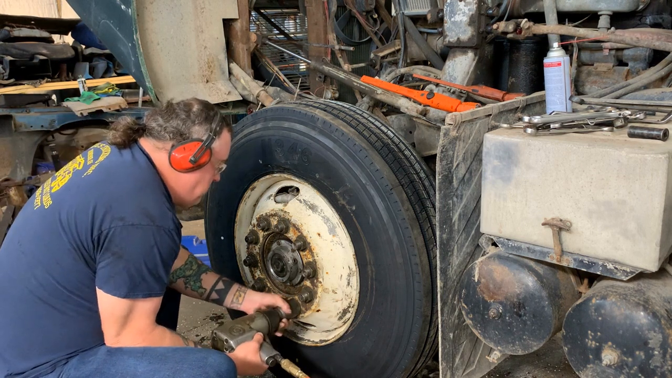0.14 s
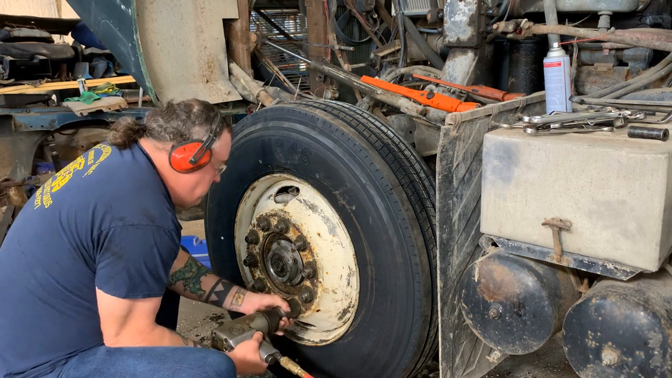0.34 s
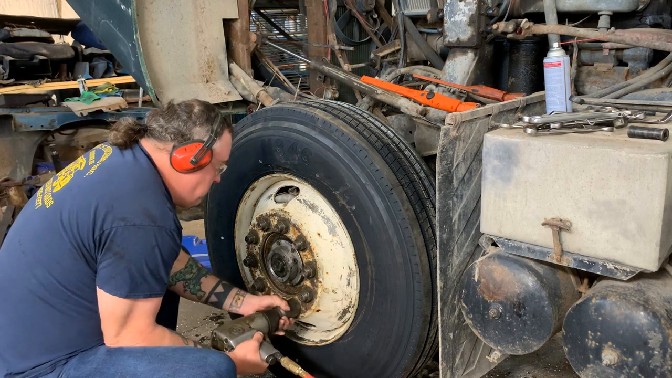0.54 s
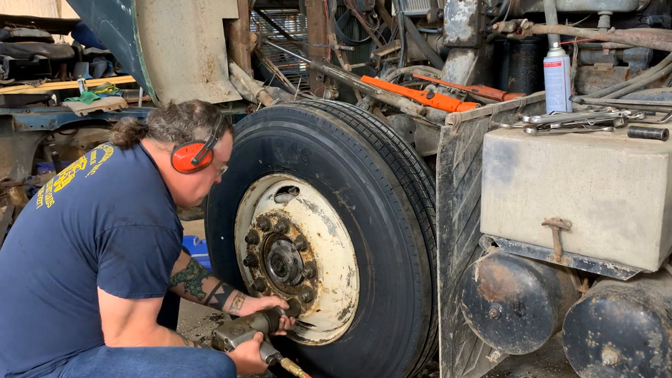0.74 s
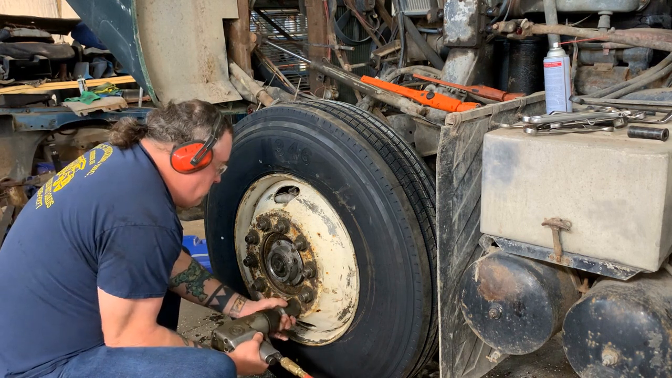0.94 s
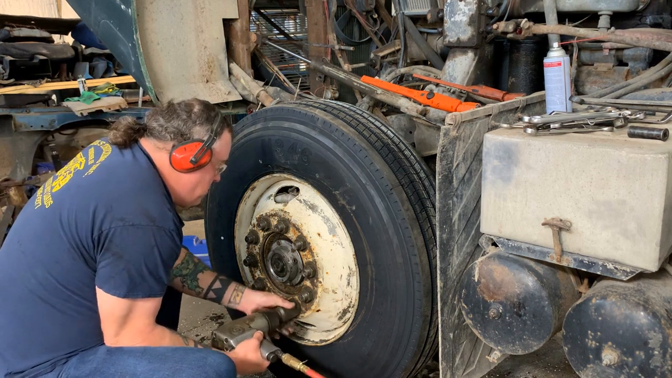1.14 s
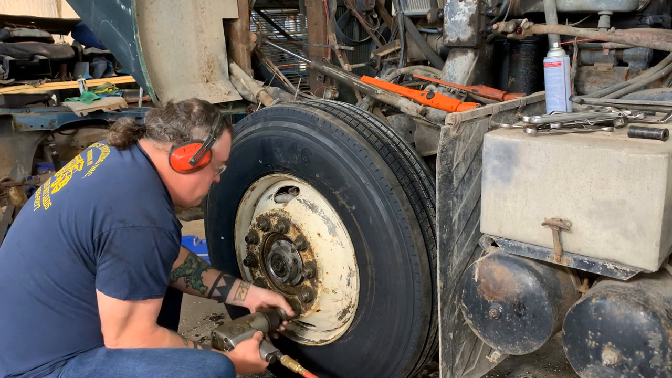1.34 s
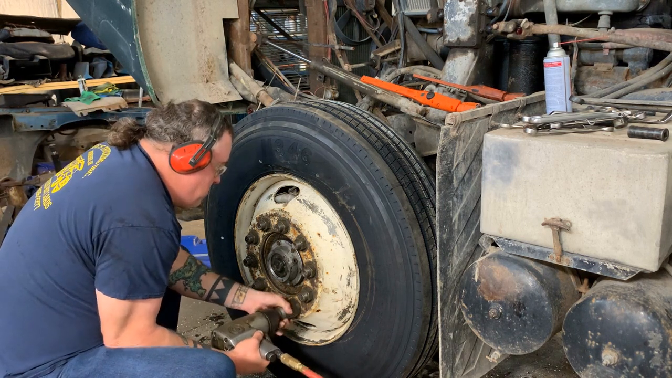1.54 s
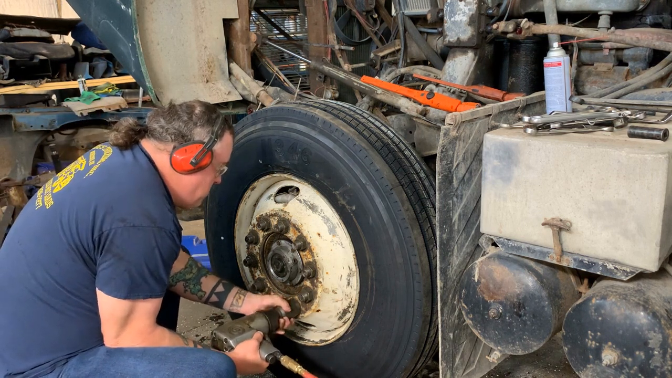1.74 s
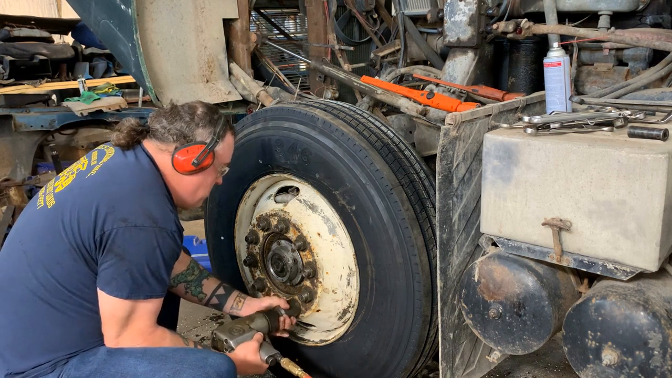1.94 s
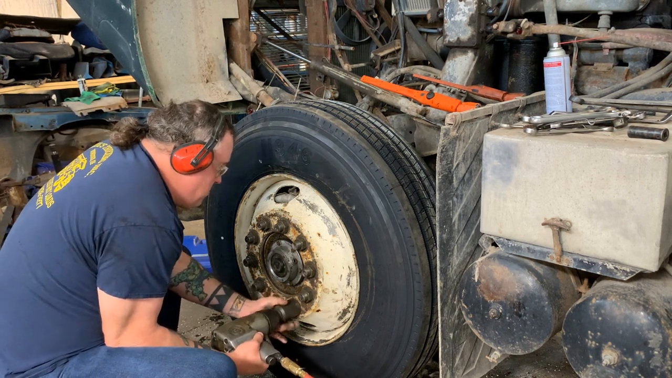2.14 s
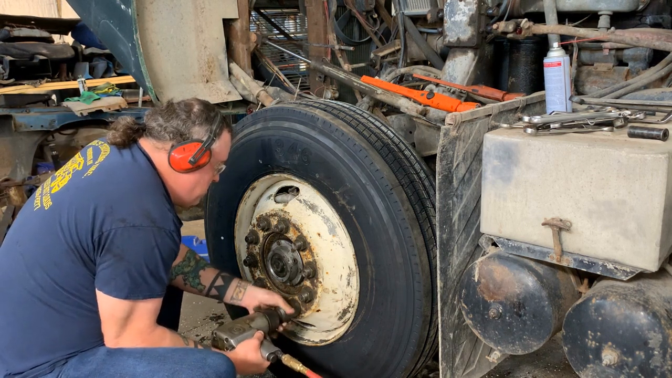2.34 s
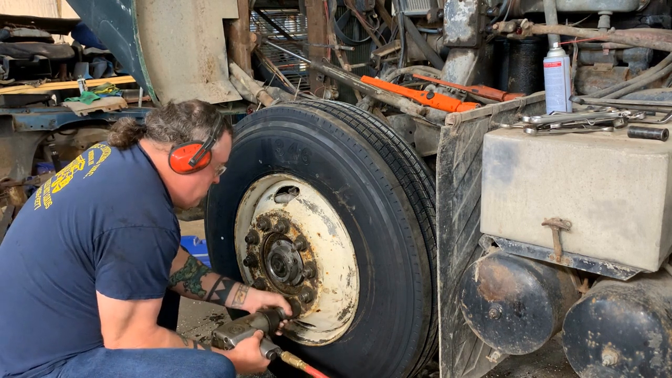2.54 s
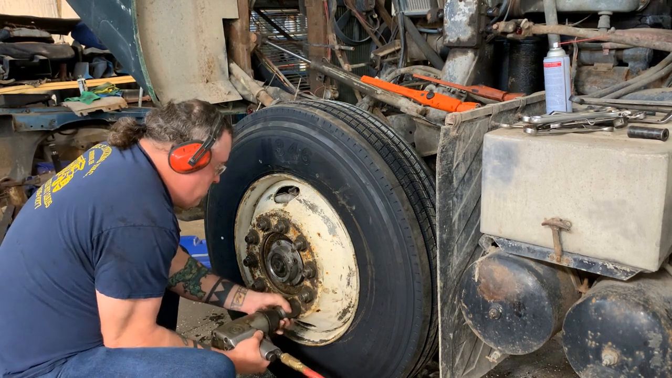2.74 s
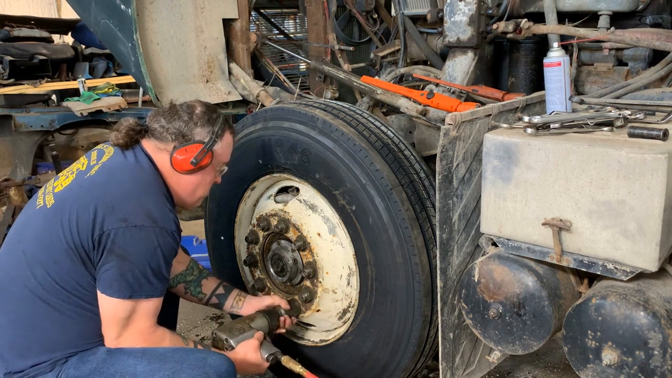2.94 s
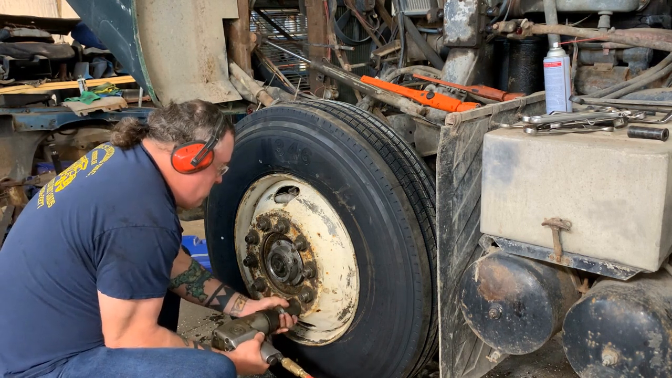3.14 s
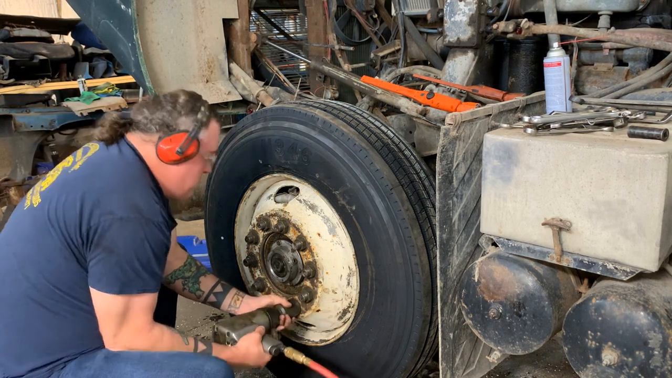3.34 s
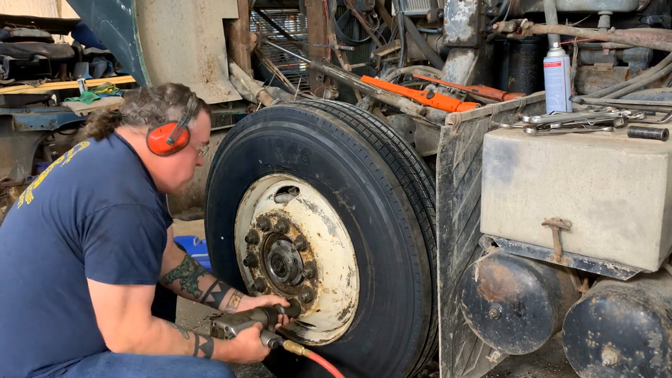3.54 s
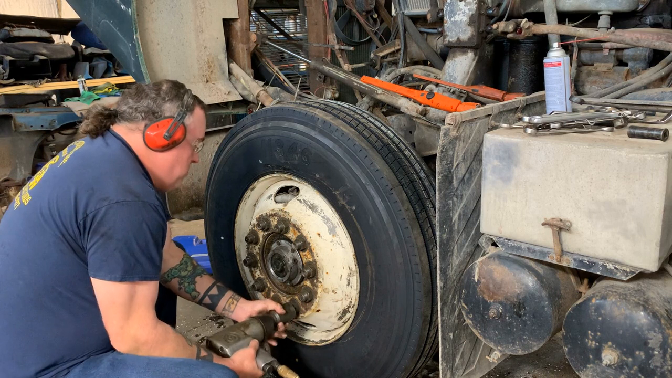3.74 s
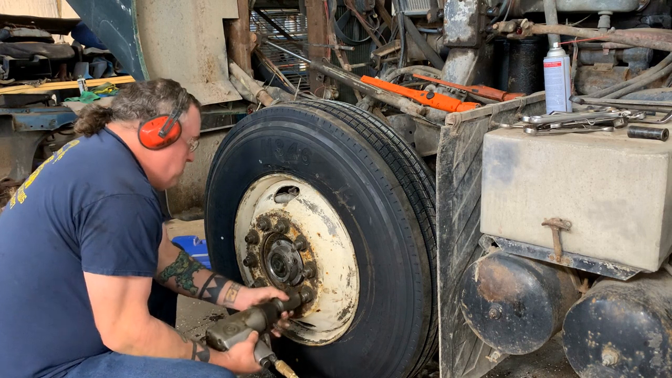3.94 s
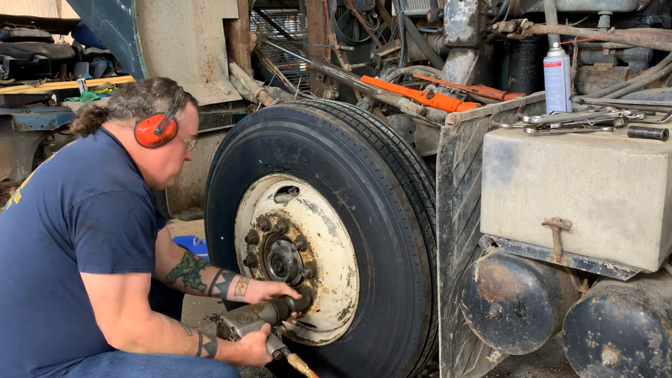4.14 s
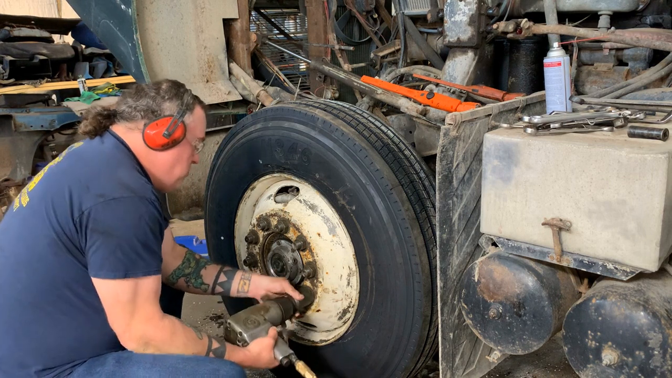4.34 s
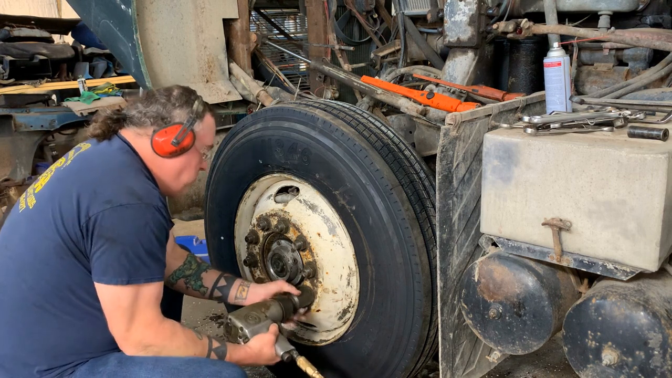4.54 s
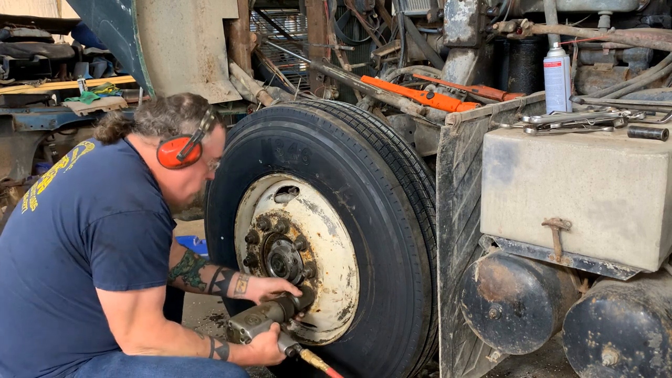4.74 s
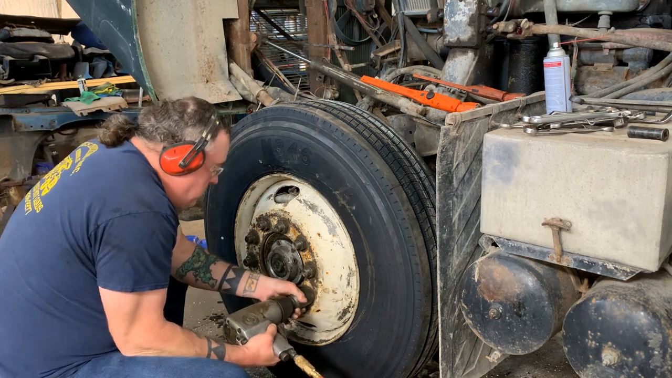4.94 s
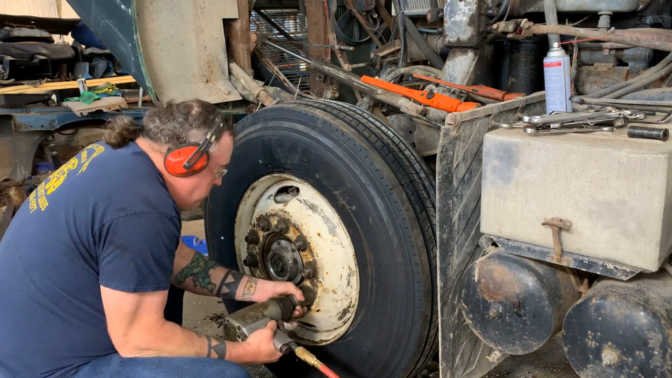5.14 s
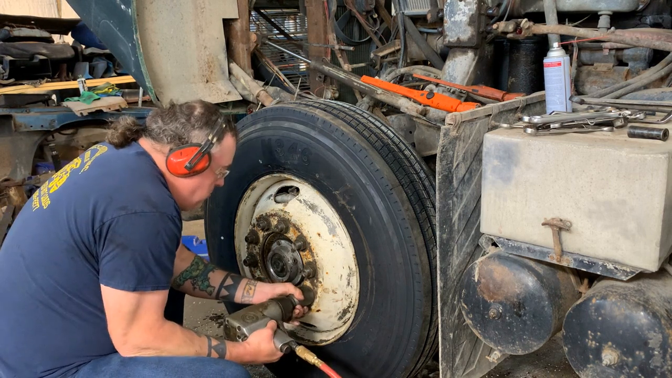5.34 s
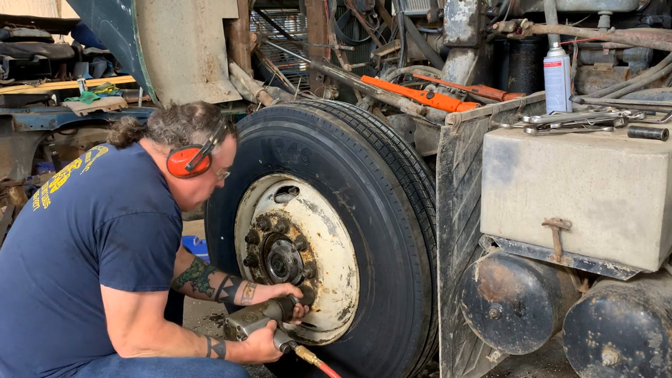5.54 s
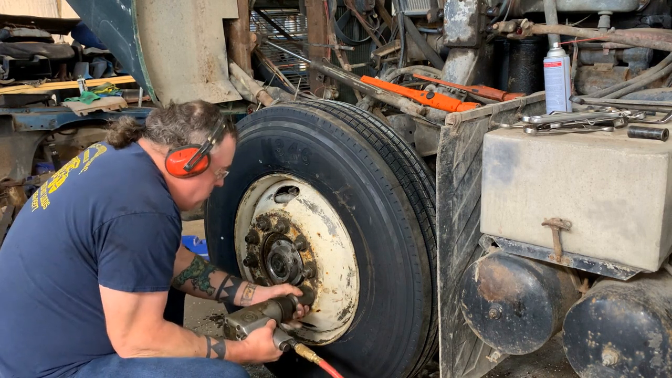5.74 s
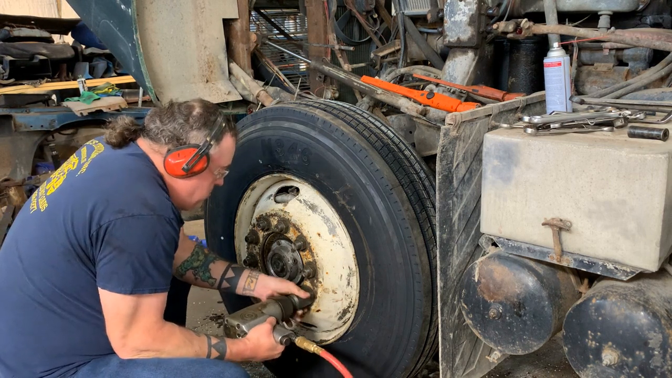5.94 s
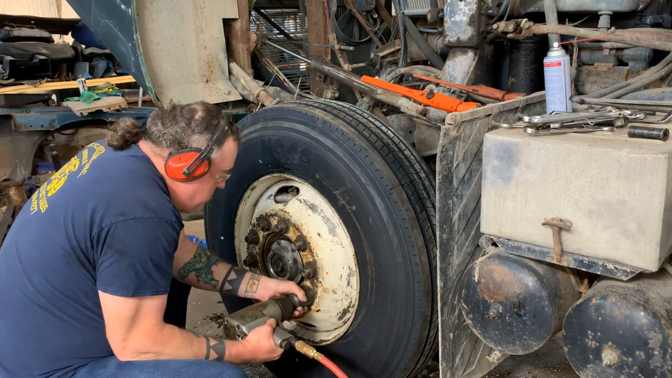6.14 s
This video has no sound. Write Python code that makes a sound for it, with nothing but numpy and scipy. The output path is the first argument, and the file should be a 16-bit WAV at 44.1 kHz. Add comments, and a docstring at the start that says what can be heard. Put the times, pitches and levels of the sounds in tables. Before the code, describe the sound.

Close, harsh pneumatic wrench clatter with hissing air between blows, a short break of light steel taps, then more hammering in a workshop.

```python
"""Inside a workshop, two close microphone ports a metre or two from an air impact wrench on truck wheel nuts.
From the start the hammer cracks and rings socket and rim; partway to the next blow it lets go with a click
and air rushes out until that blow. At about 3.3 s it pauses and the socket clinks; from 4.5 s it hammers
to the end. Shaped noise bursts and damped modes make the steel, gated noise the air; throughout, sine
partials and rumble make a piston compressor behind, over shop hiss."""
import sys
import numpy as np
from scipy import signal
from scipy.fft import rfft, irfft
from scipy.io import wavfile
from scipy.ndimage import uniform_filter1d

SR = 44100
rng = np.random.default_rng(int(sys.argv[2]) if len(sys.argv) > 2 else 0)


def ratio_of_db(decibels):
    """Turn decibels (scalar or array-like) into linear amplitude factors; 0 dB maps to 1."""
    return 10 ** (np.asarray(decibels, float) / 20)


def put_to_file(sound):
    """Save the sound as 16-bit audio at rate SR, in the file named by the first command-line argument."""
    columns = np.atleast_2d(sound).T  # one column per channel
    safe = np.clip(columns, -1, 1)
    whole_steps = np.round(safe * 32767)
    wavfile.write(sys.argv[1], SR, whole_steps.astype(np.int16))


N = 272979  # samples
FREQ = np.arange(N // 2 + 1) * SR / N + 1e-3  # Hz
# every source has two channels: what both ports share, and what sets them apart
SHARED_ONLY = np.array([[1], [0]])


def curve(points):
    """A (f/Hz, value) table read at every frequency, straight along log frequency."""
    hz, value = np.transpose(points)
    return np.interp(np.log(FREQ), np.log(hz + 1), value)


def shaped_noise(gain):
    """Two unrelated noises with the given gain at every frequency, rms 1 overall."""
    noise = irfft(rfft(rng.standard_normal((2, N))) * gain, N)
    return noise / np.sqrt(np.mean(noise ** 2))


def hiss(points):
    """Two unrelated noises coloured by a (f/Hz, level/dB) table."""
    return shaped_noise(ratio_of_db(curve(points)))


def spikes(s, db):
    """Impulses at the given times and levels."""
    out = np.zeros(N)
    place = np.clip((np.asarray(s) * SR).astype(int), 0, N - 1)
    np.add.at(out, place, ratio_of_db(db))
    return out


def decay(t, t60):
    """Exponential fall that reaches -60 dB after t60 seconds."""
    return np.exp(-np.log(1000) * t / t60)


def bursts(s, db, t60, rise):
    """Envelope that swells for about `rise` s at each time and dies away; peak near the given level."""
    swell = np.hanning(2 * int(rise * SR) + 3)
    fall = signal.lfilter([1], [1, -decay(1 / SR, t60)], spikes(s, db))
    return signal.fftconvolve(fall, swell / swell.sum())[:N]


def flutter(rate):
    """Random values gliding to a new one `rate` times a second, with a spread of about 0.75."""
    hold = int(SR / rate)
    steps = np.repeat(rng.standard_normal(N // hold + 1), hold)
    return 0.92 * uniform_filter1d(steps, hold)[:N]


# shop floor hiss, spectrum before scaling to rms 1: f/Hz, level/dB
SHOP = [(400, -2), (1000, -3.5), (2900, -5.5), (5500, -13.5), (8600, -8), (11200, -13.5), (15800, -21.5)]


def shop_hiss():
    """Broad noise from the far shop floor, its level wandering slowly."""
    return ratio_of_db(-61) * hiss(SHOP) * ratio_of_db(0.48 * flutter(4.8))


# strong compressor partials: multiple of the stroke rate, rms level/dB
STROKE = [(4, -65), (5, -64), (7, -74), (12, -62.5), (15, -65.5), (17, -66.5), (20, -64), (21, -69.5),
          (23, -66.5), (24, -65.5), (28, -68.5), (29, -70), (30, -64), (31, -70.5), (32, -62.5),
          (34, -63.5)]
# compressor rumble, spectrum before scaling to rms 1: f/Hz, level/dB
PUMP = [(25, -33), (50, -12), (120, -2.5), (200, -12), (400, -2), (480, -7.5), (650, -39.5)]


def compressor():
    """Steady partials of the piston stroke; mains hum that throbs with the stroke; some rumble."""
    stroke_hz, hum_hz, hum_db, rumble_db = 12.381, 120, -58, -62
    weak_db, weak_scatter_db = -75, 5.5  # partials outside the table
    t = np.arange(N) / SR
    order = np.arange(4, 40)
    db = weak_db + weak_scatter_db * rng.standard_normal(len(order))
    for multiple, strong_db in STROKE:
        db[order == round(multiple)] = strong_db
    phase = 2 * np.pi * stroke_hz * np.outer(order, t)
    start = 2 * np.pi * rng.random((2, len(order)))  # each channel has its own phases
    strokes = np.array([ratio_of_db(db) @ np.sin(phase + p[:, None]) for p in start])
    throb = 1 + 0.26 * np.sin(2 * np.pi * stroke_hz * t)
    hum = ratio_of_db(hum_db) * throb * np.sin(2 * np.pi * hum_hz * t) * SHARED_ONLY
    return np.sqrt(2) * (strokes + hum) + ratio_of_db(rumble_db) * hiss(PUMP)


# reverberation bands: low f/Hz, high f/Hz, level/dB
ROOM = [(188, 1000, -8.5), (1240, 3600, -9), (2700, 2900, -12.5), (3260, 4900, -9), (4700, 9100, -10),
        (8900, 12900, -13), (12600, 14000, -24.5)]
# decay of each of those bands: t/s to -60 dB
ROOM_T60_S = [.5, .6, .62, .8, .58, .42, .3]


def room(x):
    """Diffuse tail of the shop: noise in bands, each with its own decay."""
    t = np.arange(SR) / SR
    tail = 0
    for (low_hz, high_hz, db), t60 in zip(ROOM, ROOM_T60_S):
        band_filter = signal.butter(4, [low_hz, high_hz], "band", fs=SR, output="sos")
        band = signal.sosfilt(band_filter, rng.standard_normal((2, len(t))))
        # the root keeps the energy of a band independent of its decay time
        tail = tail + ratio_of_db(db) * band * decay(t, t60) / np.sqrt(t60 * SR / 14)
    tail = tail * np.minimum(t / 0.0063, 1)
    return signal.fftconvolve(x, tail, axes=1)[:, :N]


# how hard the tool body kicks, also read by the tyre: t/s, level/dB
KICK = [(0, -44), (.6, -45.5), (1.2, -42.5), (1.8, -43), (2.4, -41.5), (3.2, -43.5), (4.5, -41.5),
        (5.0, -41.5), (5.6, -42), (6.2, -38.5)]


def thump():
    """The tool body throbs as the hammer winds up for each blow: a few rising cycles, low and soft."""
    middle_hz, glide_hz, spin_s, lead_s = 138.7, 155.4, 0.038, 0.03213
    s = np.array(BLOWS)[1:, 0] - lead_s
    db = np.interp(s, *np.transpose(KICK)) + 0.4 * rng.standard_normal(len(s))
    t = np.arange(int(spin_s * SR)) / SR
    # the pitch climbs as the rotor gathers speed
    pitch_hz = middle_hz + glide_hz * (t / spin_s - .5)
    kick = np.hanning(len(t)) * np.sin(2 * np.pi * np.cumsum(pitch_hz) / SR)
    return signal.fftconvolve(spikes(s, db), kick)[:N] * SHARED_ONLY


def tyre():
    """The tyre booms softly: a low damped mode struck by each blow, more by a harder kick."""
    mode_hz, t60_s, mean_db, db_per_kick_db = 72.2, 0.29, -54.5, 3.0
    s = np.array(BLOWS)[:, 0]
    t = np.arange(SR // 2) / SR
    mode = np.sin(2 * np.pi * mode_hz * t) * decay(t, t60_s)
    kick_db = np.interp(s, *np.transpose(KICK))
    db = mean_db + db_per_kick_db * (kick_db - kick_db.mean())
    return signal.fftconvolve(spikes(s, db), mode)[:N] * SHARED_ONLY


# socket set on the next nut:
# t/s, strength/dB, low parts over strength/dB, crack over strength/dB, hub thud level/dB
CLINKS = [(3.742, -69, 8.5, -4, -71), (4.019, -47.5, -1, -15, -60), (4.129, -44.5, -2.5, -8.5, -47),
          (4.32, -41, -5.5, -5, -50), (4.336, -51.5, -1.5, -5, -74), (4.446, -33.5, -13.5, -8, -68)]
# hollow hub, spectrum before scaling to rms 1: f/Hz, level/dB
HUB = [(300, -30), (560, -15), (690, 5), (800, -11), (1200, -43)]


def clinks():
    """Light taps of the socket, dying more slowly than blows, with a hollow thud from the hub."""
    rows = np.array(CLINKS)
    thud = bursts(rows[:, 0], rows[:, -1], 0.1, 0.0017) * hiss(HUB)
    return steel_hits(rows[:, :-1], slow=1.8) + thud


# the air motor: t/s, exhaust rush/dB, release click/dB, share of the turn left at release (0-1);
# both levels before the gains and scatter in exhaust()
MOTOR_RUN = [(0.02, -26, -14, 0.56), (.08, -32.5, -43, 0.48), (.45, -33, -37, 0.62), (.8, -34, -53, 0.65),
             (1.0, -32, -18.5, 0.55), (1.2, -31, -19, 0.53), (1.45, -32, -22, 0.5), (1.9, -32.5, -15, .51),
             (2.3, -31, -21, 0.56), (2.6, -30.5, -23, 0.43), (3.25, -34.5, -20, 0.68),
             (4.45, -31, -17, 0.75), (4.7, -27.5, -39, 0.41), (5.05, -30, -29, 0.57),
             (5.35, -29.5, -40, 0.57), (5.75, -30.5, -30, 0.54), (5.88, -28, -17, 0.55),
             (6.02, -27.5, -20, 0.57), (6.15, -30.5, -16, 0.5)]
# spectra before scaling to rms 1, of exhaust air, release click, air in the motor housing: f/Hz, level/dB
AIR = [(1500, -29.5), (3500, -15), (5500, -11.5), (6800, -6.5), (8000, 1), (11000, -3), (13500, -1.5),
       (15800, -9)]
CLICK = [(800, -18.5), (2500, -12.5), (5000, -17.5), (7000, -3.5), (11000, -1.5), (15800, -2)]
MOTOR = [(300, -9.5), (500, -8.5), (528, -7.5), (560, -7), (800, -13.5), (1300, -3), (2350, -1.5),
         (3300, -3.5), (4500, -6), (5600, -1), (7500, 0.5), (11000, 2), (15800, -3.5)]


def exhaust():
    """Air rushes from each release to the next blow, chopped by the vanes; a click opens it; the motor drones on."""
    rush_gain_db, click_gain_db, drone_gain_db = 3.5, 2.5, 4
    rush_scatter_db, click_scatter_db = 0.45, 3.5
    trigger_lead_s, empty_s = .035, .035
    blow_s = np.array(BLOWS)[:, 0]
    turn_s, next_s = np.diff(blow_s), blow_s[1:]
    when, *controls = np.transpose(MOTOR_RUN)
    rush_db, click_db, left = (np.interp(next_s - trigger_lead_s, when, c) for c in controls)
    rush_db = rush_db + rush_scatter_db * rng.standard_normal(len(turn_s))
    click_db = click_db + click_scatter_db * rng.standard_normal(len(turn_s))
    # after a pause the trigger opens the air just before the first blow
    lead_s = np.where(turn_s > 10 * trigger_lead_s, trigger_lead_s, left * turn_s)
    release_s, stop_s = next_s - lead_s, next_s + 0.0021
    gate = np.cumsum(spikes(release_s, rush_db) - spikes(stop_s, rush_db))
    vanes = ratio_of_db(1.8 * flutter(220))
    rush = signal.lfilter([.012], [1, -.988], gate) * vanes * hiss(AIR)
    # the housing empties slowly, so air keeps moving through the stall
    keep = np.exp(-1 / (empty_s * SR))
    housing = signal.lfilter([1 - keep], [1, -keep], gate)
    drone = housing * ratio_of_db(2.35 * flutter(120)) * hiss(MOTOR)
    click = bursts(release_s, click_db, 0.019, 0.0024) * hiss(CLICK)
    return ratio_of_db(rush_gain_db) * rush + ratio_of_db(click_gain_db) * click + ratio_of_db(drone_gain_db) * drone


# mode clusters of socket and rim, also set off by strike(): f/Hz, width/Hz, level/dB
STEEL = [(1238, 100, -7.5), (1500, 43, -6.5), (1995, 80, -8.5), (2438, 174, -0.5), (2823, 17, -3),
         (3770, 1080, -1), (4510, 210, 1), (4950, 290, -2.5), (6960, 300, -1.5), (8250, 770, -4.5),
         (11400, 1400, -10)]


def ring():
    """Many close modes beat against each other, so the ring has a new colour at every blow."""
    power = sum(ratio_of_db(2 * db) / (1 + (2 * (FREQ - hz) / width) ** 4) for hz, width, db in STEEL)
    return shaped_noise(np.sqrt(power))


def strike(s, db):
    """The contact itself sets each mode cluster off cleanly, in a new mix at every blow."""
    scatter_db, t60_s = 4.0, 0.041  # wide clusters die sooner than this
    t = np.arange(SR // 10) / SR
    out = 0
    for hz, width, mode_db in STEEL:
        mix_db = scatter_db * rng.standard_normal(len(s))
        mode = np.sin(2 * np.pi * hz * t) * decay(t, t60_s) * np.exp(-np.pi * width * t)
        out = out + signal.fftconvolve(spikes(s, db + mode_db + mix_db), mode)
    return out[:N] * SHARED_ONLY


def steady(x):
    """Even out the chance swells of a noise over 4 ms, so that equal blows sound equally strong."""
    return x / np.sqrt(uniform_filter1d(x ** 2, int(.004 * SR)) + 0.055)


# the four parts of a hit, spectra before scaling to rms 1: f/Hz, level/dB
KNOCK = [(250, -28.5), (550, -19.5), (750, -11), (1100, -0.5), (1600, 0.5), (2000, 3), (2800, -51.5)]
CLANK = [(1200, -39), (1800, -8), (2400, 3), (3100, -0.5), (4300, -47.5)]
CRACK = [(2400, -33.5), (3300, -4.5), (3800, 2), (4400, 2), (5400, 4.5), (7000, -24)]
TICK = [(4500, -33.5), (6200, 6), (7200, 7.5), (9000, 9.5), (10600, 8.5), (12500, 5), (15800, -1.5)]


def steel_hits(rows, slow):
    """Knock, clank, crack and tick of steel on steel, a rebound just after, and the ring they leave."""
    scatter_db = 1.0  # of each part, from hit to hit
    knock_per_db = 0.2  # harder blows reach deeper into the rim: extra knock dB per dB of strength
    bounce_s, bounce_db = .0058, -9.0
    ring_db, ring_t60_s, nearness_db = -3, 0.1, 9.5  # nearness of the steel to the microphone
    s, strength_db, low_db, mid_db = np.transpose(rows)
    body_db = strength_db + low_db
    knock_db = body_db - 12 + knock_per_db * (strength_db - strength_db.mean())
    levels = np.array([knock_db, body_db - 13, strength_db + mid_db - 10, strength_db - 13.5])
    levels = levels + scatter_db * rng.standard_normal(levels.shape)
    late_s = s + bounce_s * (1 + 0.44 * rng.standard_normal(len(s)))
    # seconds to -60 dB, before `slow` stretches them
    parts = ((KNOCK, 0.028), (CLANK, 0.032), (CRACK, 0.023), (TICK, 0.026))
    out = 0
    for db, (points, t60) in zip(levels, parts):
        first = bursts(s, db, t60 * slow, 0.0012)
        rebound = bursts(late_s, db + bounce_db, t60 * slow, 0.0026)
        out = out + (first + rebound) * steady(hiss(points))
    # loose parts chatter, so the burst is grainy
    out = out * ratio_of_db(1.5 * flutter(900))
    contact = strike(s, body_db - 18)
    crack_db = levels[2]
    ringing = bursts(s, crack_db + ring_db, ring_t60_s, 0.00011) * ring()
    return ratio_of_db(nearness_db) * (out + contact + ringing)


# hammer blows, also timing air, throb and tyre:
# t/s, strength/dB, low parts over strength/dB, crack over strength/dB
BLOWS = [(0.0004, -17, -15, -5.5), (0.0412, -5.5, -18.5, -11), (0.0957, -19, -7.5, -12),
         (0.1507, -17, -11, -16), (0.2043, -17.5, -10.5, -10), (0.2622, -17, -9.5, -11),
         (0.3187, -15.5, -8.5, -16), (0.374, -14, -11.5, -19), (0.435, -16.5, -11, -17),
         (0.49, -14.5, -12, -18), (0.5488, -13, -15, -16), (0.6108, -14.5, -12.5, -18),
         (0.671, -12, -14, -23), (0.7297, -12.5, -15.5, -19), (0.7907, -13.5, -15, -17),
         (0.85, -14, -12, -18.5), (0.9118, -14, -11, -20), (0.9715, -14, -14.5, -16),
         (1.0358, -10.5, -15, -18), (1.0995, -2, -21.5, -17), (1.1548, -6.5, -18, -12.5),
         (1.21, -9, -15, -15.5), (1.265, -7, -20, -16.5), (1.3199, -11, -15.5, -18),
         (1.3857, -11, -20, -15), (1.4495, -7, -19, -13), (1.511, -13.5, -12.5, -21),
         (1.5794, -6, -20.5, -18.5), (1.6408, -9.5, -18.5, -17.5), (1.708, -11, -17.5, -17.5),
         (1.7735, -9, -17.5, -18), (1.8395, -10.5, -19, -16.5), (1.905, -13, -15, -15.5),
         (1.9707, -16, -11, -12), (2.0363, -11, -14, -18), (2.1073, -12, -12.5, -14.5),
         (2.176, -7, -14, -15.5), (2.229, -6, -21.5, -17), (2.2828, -6, -18, -15.5),
         (2.3366, -2, -20.5, -19), (2.392, -13, -10.5, -17), (2.4514, -8, -21, -18.5),
         (2.5143, -9.5, -18, -18), (2.584, -7.5, -18, -16), (2.6466, -7, -19.5, -20.5),
         (2.7135, -8, -17, -18.5), (2.7801, -12.5, -13.5, -14), (2.8483, -11, -15, -16),
         (2.9174, -13.5, -12, -13), (2.9857, -10.5, -14, -17), (3.054, -14, -11, -15.5),
         (3.1235, -10, -14.5, -21), (3.1909, -7.5, -18.5, -16), (3.2541, -2, -20, -14.5),
         (4.4916, -12, -9.5, -15.5), (4.5462, -11, -9.5, -12.5), (4.6024, -2.5, -21, -14.5),
         (4.657, -4.5, -22.5, -13.5), (4.7125, -3, -19.5, -13.5), (4.7674, -3, -15, -13.5),
         (4.8238, -5, -18.5, -13), (4.879, -5.5, -16, -11), (4.9352, -9.5, -16.5, -12.5),
         (4.9923, -15.5, -11, -8.5), (5.0504, -14, -11, -14), (5.11, -14.5, -10.5, -11),
         (5.1661, -11.5, -14.5, -14), (5.226, -13, -12.5, -18), (5.2826, -13, -11.5, -13),
         (5.3422, -14, -9, -8.5), (5.4001, -9.5, -15.5, -15), (5.459, -11, -14.5, -11),
         (5.52, -10.5, -13, -13), (5.5789, -8.5, -15, -14.5), (5.6404, -13, -11.5, -11),
         (5.7002, -7.5, -18, -16.5), (5.7607, -12, -13.5, -13), (5.8227, -3.5, -23.5, -17),
         (5.878, -2, -23, -17), (5.9338, -7, -19.5, -12.5), (5.9896, -6.5, -19, -13),
         (6.0431, -3.5, -19, -16.5), (6.0964, -10.5, -17, -12.5), (6.1605, -9.5, -18.5, -11)]


def hammer_blows():
    """The hammer drives the socket: steel hits that die a little sooner than the part times."""
    return steel_hits(BLOWS, slow=0.83)


def scene():
    """The wrench with its echo, over compressor and hiss."""
    wrench = hammer_blows() + clinks() + exhaust() + thump() + tyre()
    return wrench + room(wrench) + compressor() + shop_hiss()


def roll_off(x):
    """The treble ends steeply here."""
    return signal.sosfilt(signal.butter(12, 17130, fs=SR, output="sos"), x)


# share of sound that sets the two channels apart: f/Hz, level/dB
UNLIKE = [(30, -20), (60, -7.5), (200, -9.5), (400, -8.5), (800, -4.5), (2000, -4), (4400, 0.5),
          (6500, -4.5), (8000, -36), (16000, -25)]
# phase by which the left port leads: f/Hz, lead/rad
LEAD = [(0, 0), (340, -.3), (950, .7), (1890, .6), (3360, 1.6), (4310, .8), (5430, 1.8), (6200, 0),
        (8550, -3.14), (11000, -6.28), (13400, -9.42), (15800, -12.57)]
# left minus right: f/Hz, level/dB
TILT = [(110, 0.7), (380, 0.3), (700, -2), (1290, -0.5), (2380, 0), (4400, -4), (8120, -0.6), (15000, 0.3)]


def record(dry):
    """The two channels carry much the same sound, wholly alike in the treble, where the left one runs late; top
    and bottom are cut."""
    top_hz, low_hz = 15800, 45
    common, apart = rfft(dry)
    apart = apart * ratio_of_db(curve(UNLIKE))
    hz, lead = np.transpose(LEAD)
    # half of each difference goes to either port
    turn = ratio_of_db(curve(TILT) / 2) * np.exp(.5j * np.interp(FREQ, hz, lead))
    ports = irfft(np.array([(common + apart) * turn, (common - apart) / turn]), N)
    mix = signal.sosfilt(signal.ellip(10, .2, 70, top_hz, fs=SR, output="sos"), ports)
    mix = signal.sosfilt(signal.butter(4, low_hz, "high", fs=SR, output="sos"), mix)
    return roll_off(mix)


dry = scene()
out = record(dry)
put_to_file(out)
```